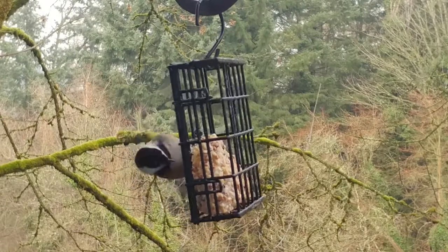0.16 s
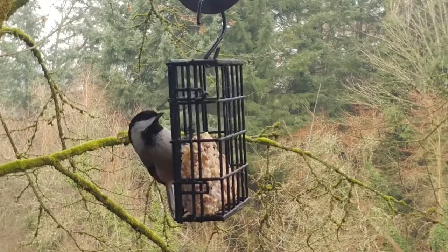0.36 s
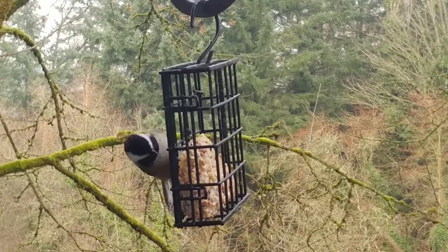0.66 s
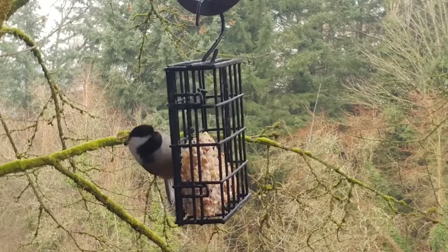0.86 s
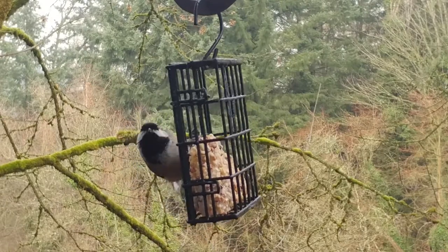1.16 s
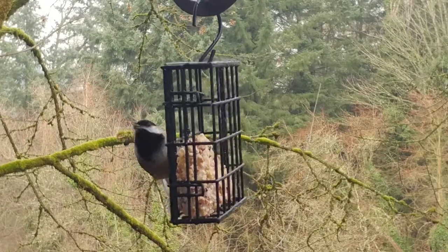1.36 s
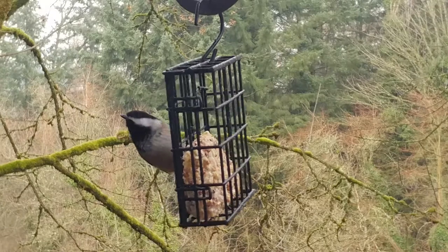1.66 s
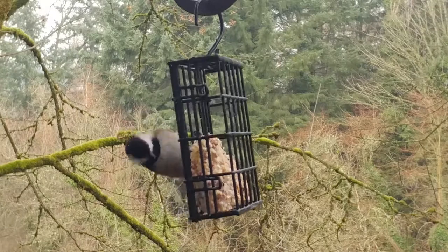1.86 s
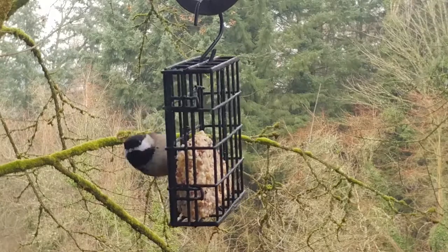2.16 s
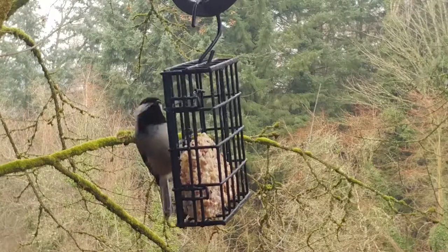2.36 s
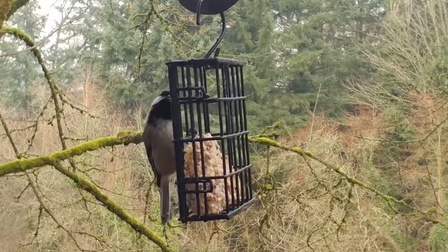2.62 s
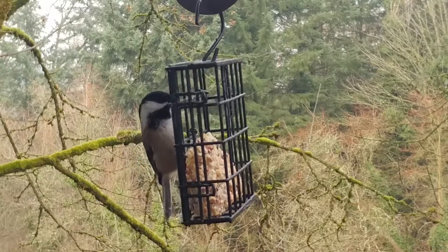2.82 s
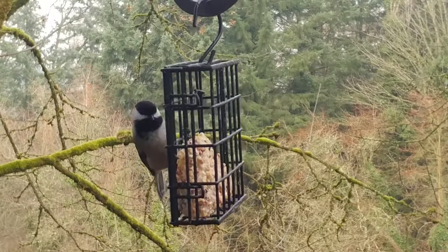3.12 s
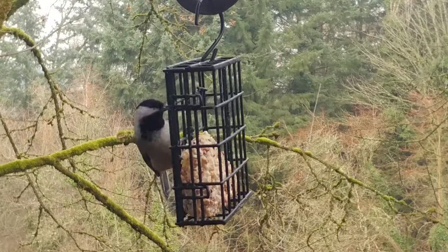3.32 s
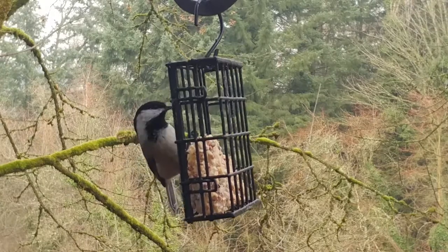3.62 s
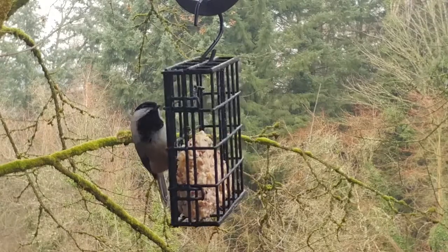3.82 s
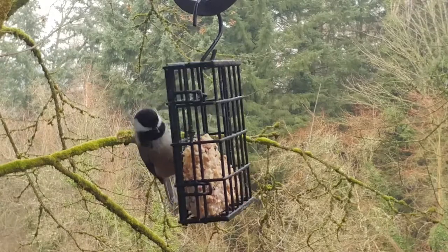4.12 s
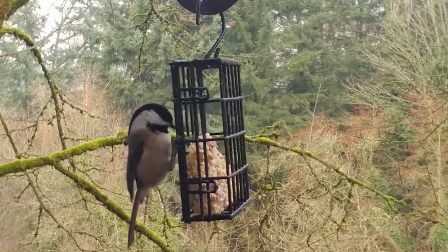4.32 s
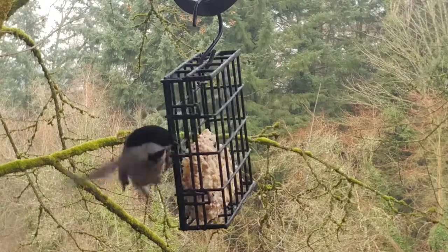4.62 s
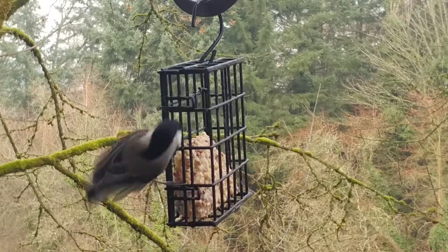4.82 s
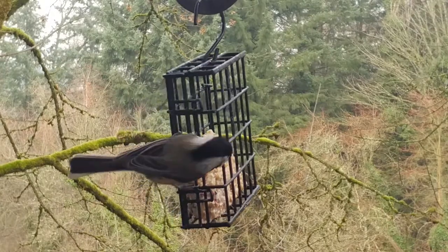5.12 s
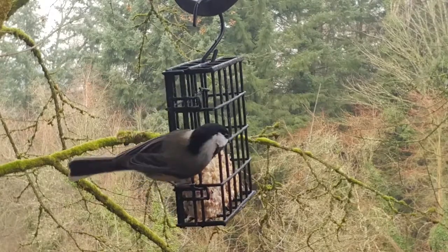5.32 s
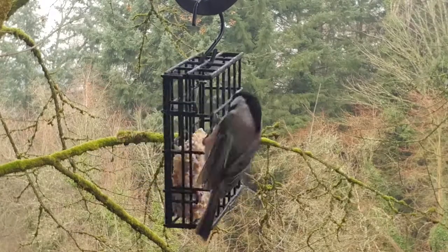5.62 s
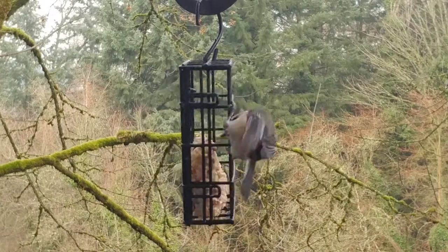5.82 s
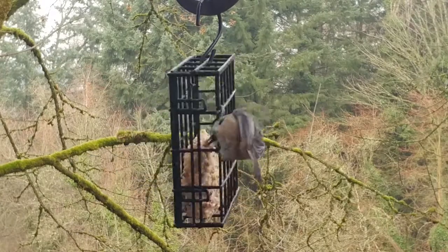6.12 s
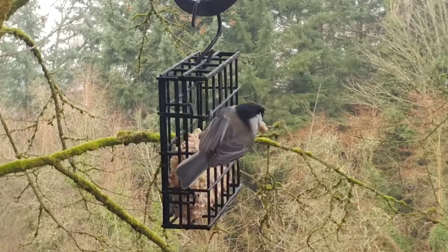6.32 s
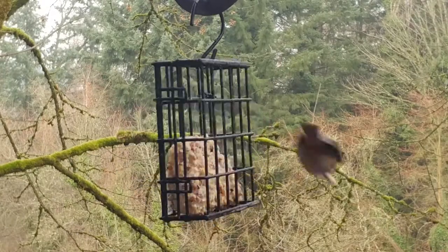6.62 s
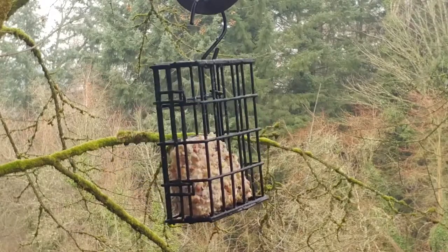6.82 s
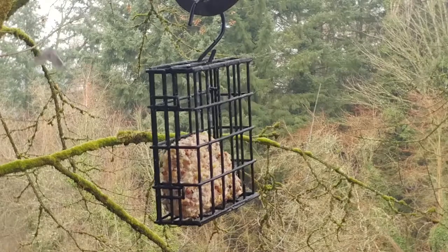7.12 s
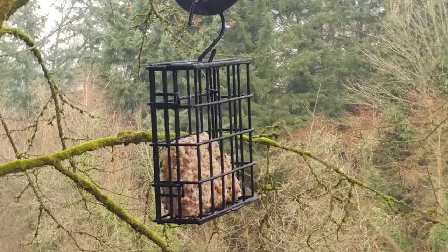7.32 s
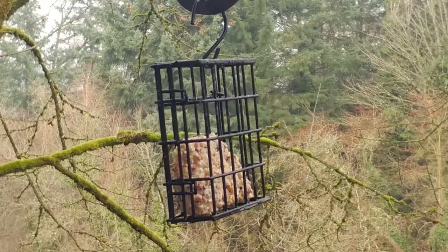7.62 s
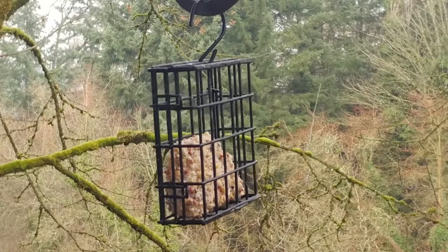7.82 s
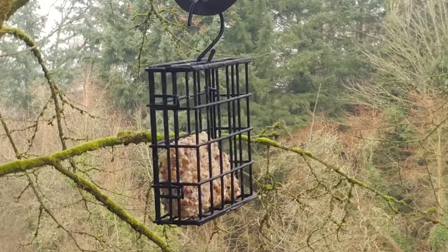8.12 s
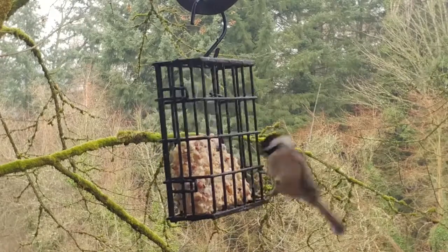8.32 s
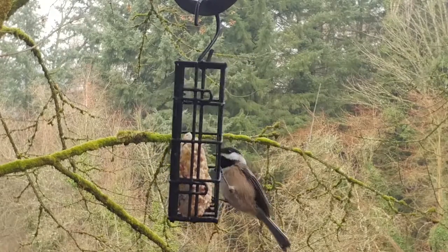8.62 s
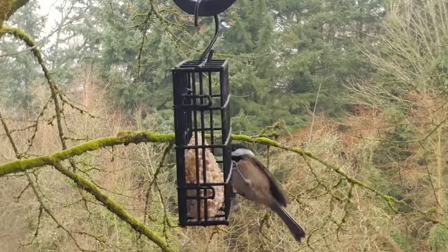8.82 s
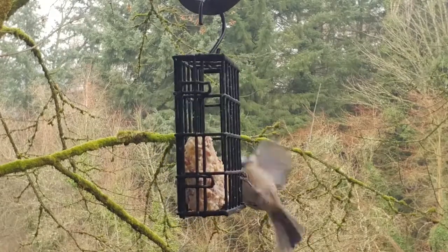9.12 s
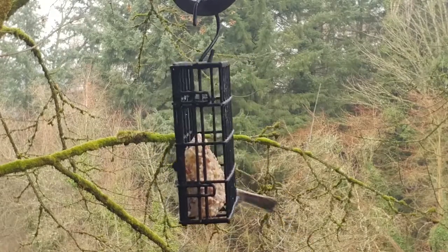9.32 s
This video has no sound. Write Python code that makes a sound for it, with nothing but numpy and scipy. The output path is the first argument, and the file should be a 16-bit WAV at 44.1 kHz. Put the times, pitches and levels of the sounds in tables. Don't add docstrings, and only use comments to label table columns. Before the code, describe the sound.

Chickadees give thin high calls and one quick gargle at a woodland feeder while distant road roar gives way to a car approaching from the right.

```python
import sys
import numpy as np
from scipy import signal
from scipy.fft import rfft, irfft, next_fast_len
from scipy.io import wavfile
from scipy.ndimage import uniform_filter1d, map_coordinates

SR = 44100
rng = np.random.default_rng(int(sys.argv[2]) if len(sys.argv) > 2 else 0)


def boost_factor(decibels):
    exponent = np.asarray(decibels, float) / 20
    return 10 ** exponent


def master(y):
    cut = np.clip(np.atleast_2d(y).T, -1, 1)
    pcm = np.round(cut * 32767)
    wavfile.write(sys.argv[1], SR, pcm.astype(np.int16))


N = 417186


def unit(x):
    return x / np.sqrt(np.mean(x ** 2) + 1e-20)


def along(points, hz):
    f, v = np.transpose(points)
    return np.interp(np.log(hz + 1), np.log(f + 1), v)


def curves(rows, t):
    s, *cols = np.transpose(rows)
    return [np.interp(t, s, c) for c in cols]


def wobble(rate):
    knots = rng.standard_normal(int(N * rate / SR) + 4)
    return map_coordinates(knots, [np.arange(N) * rate / SR])


def filtered(x, response):
    m = next_fast_len(x.shape[-1] + SR // 4)
    y = irfft(rfft(x, m) * response(np.fft.rfftfreq(m, 1 / SR)), m)
    return y[..., :x.shape[-1]]


def resonance(f, hz, width_hz):
    return 1j * f * width_hz / (hz ** 2 - f * f + 1j * f * width_hz)


def rush(spectrum, alike, patchy_db, lag=lambda hz: 0 * hz):
    z = signal.stft(rng.standard_normal((2, N)), nperseg=512)[2]
    field = uniform_filter1d(rng.standard_normal(z.shape[1:]), size=4, axis=0)
    field = uniform_filter1d(field, size=8, axis=1)
    pair = signal.istft(z * boost_factor(patchy_db * unit(field)), nperseg=512)[1][:, :N]
    m = next_fast_len(N)
    hz = np.fft.rfftfreq(m, 1 / SR)
    turn = np.arccos(np.clip(along(alike, hz), -1, 1)) / 2
    mid, side = rfft(pair, m) * boost_factor(along(spectrum, hz)) * [np.cos(turn), np.sin(turn)]
    shift = np.exp(-.5j * np.outer([1, -1], lag(hz)))
    return unit(irfft([mid + side, mid - side] * shift, m)[:, :N])


def from_right(hz):
    return 2 * np.pi * hz * 0.00043


def car_levels():
    t = np.arange(N) / SR
    # time_s, distance_m
    distances = [(0, 49), (2.5, 74), (5.4, 40), (6.2, 23), (7.2, 15.1), (9.46, 8.94)]
    # time_s, level_db
    bank_rows = [(0, -37.5), (7.4, -31), (7.95, -21), (8.2, -9.5), (8.8, -5.5), (9.25, -2.5), (9.46, -1.5)]
    near_db = -20 * np.log10(curves(distances, t)[0] / 10)
    body_db = near_db + curves(bank_rows, t)[0]
    return near_db, body_db, boost_factor(0.39 * body_db)


def rumble(spill):
    # freq_hz, density_db (per Hz)
    bass = [(15, -53), (25, -20), (56, 3), (70, -0.5), (87, 5), (104, -4), (146, -4.5), (177, -11.5),
            (227, -12.5), (260, -12.5), (340, -31), (570, -120)]
    return (boost_factor(-46) + boost_factor(-44) * spill) * rush(bass, [(30, 0.96), (250, 0.99)], patchy_db=0.5)


def far_road(spill):
    # time_s, level_db
    swell = [(0, -44), (2.5, -39), (4.2, -37), (5.4, -36), (6.3, -39), (7.2, -46.5), (9.46, -65)]
    # freq_hz, density_db (per Hz)
    roar = [(120, -55.5), (200, -8), (340, -2.5), (520, -0.5), (700, 5), (880, 0.5), (1050, -9.5),
            (1400, -17), (2100, -22.5), (3000, -37.5), (5000, -60), (9000, -120)]
    # freq_hz, coherence (0-1)
    roar_alike = [(200, 1), (350, 1), (520, 1), (700, 0.79), (950, 0.09), (1350, 0.5), (3500, 0.91),
                  (5000, 0.4)]
    road_db, = curves(swell, np.arange(N) / SR)

    def lag(hz):
        return from_right(hz) / (1 + np.exp(np.clip((480 - hz) / 90, -50, 50)))

    level = (boost_factor(road_db) + boost_factor(-36.5) * spill) * boost_factor(0.76 * wobble(8))
    return level * rush(roar, roar_alike, patchy_db=1.44, lag=lag)


def car_tyres(near_db):
    # freq_hz, density_db (per Hz)
    tyre_roar = [(100, -31.5), (200, -6.5), (350, -3.5), (520, 0.5), (700, -8), (880, -4.5), (1200, -12),
                 (1750, -21.5), (2400, -21), (3000, -33), (5000, -41.5), (7500, -38.5), (10000, -65.5),
                 (13000, -120)]
    # freq_hz, coherence (0-1)
    tyre_alike = [(200, 0.97), (400, 1), (850, 0.81), (1300, 0.48), (2300, 0.2), (5000, 0.13)]
    noise = rush(tyre_roar, tyre_alike, patchy_db=1.64,
                 lag=lambda hz: from_right(hz) / (1 + (400 / (hz + 1)) ** 4))
    return boost_factor(-33.5 + near_db + 0.56 * wobble(7)) * noise


def car_body(body_db):
    # freq_hz, density_db (per Hz)
    body_bands = [(200, -38.5), (300, -13), (430, 0), (560, 10), (680, -0.5), (850, -23), (1200, -41),
                  (1750, -37), (2100, -29), (2280, -20), (2550, -34.5), (3200, -47), (3850, -31),
                  (4400, -44.5), (5300, -48.5), (6500, -36.5), (9000, -51.5), (13000, -120)]
    # freq_hz, coherence (0-1)
    body_alike = [(200, .92), (450, 0.8), (850, 0.9), (1400, .5), (2300, 0.5), (7000, 0.1)]
    # time_s, level_db
    clearing = [(0, -30), (8.95, -22.5), (9.15, -9), (9.3, 1), (9.46, 1.5)]
    noise = rush(body_bands, body_alike, patchy_db=0.0,
                 lag=lambda hz: from_right(hz) + .5 * (hz > 450) * (hz < 1000))
    drone = boost_factor(-26 + body_db) * noise
    bright = filtered(drone, lambda hz: hz > 1800)
    return drone + boost_factor(curves(clearing, np.arange(N) / SR)[0]) * bright


def tree_hiss(spill):
    # freq_hz, density_db (per Hz)
    leaf_noise = [(1500, -16.5), (3000, 9.5), (4500, 5), (7000, -1.5), (12300, 1.5), (13300, 0),
                  (14300, -23.5), (15000, -120)]
    return (boost_factor(-69.5) + boost_factor(-65.5) * spill) * rush(leaf_noise, [(3000, 0.18), (6000, 0.038)], patchy_db=2.0)


def traffic():
    near_db, body_db, spill = car_levels()
    rolling = car_body(body_db) + far_road(spill) + car_tyres(near_db)

    def ground(hz):
        delay = np.exp(-2j * np.pi * hz * 3.008 / 1000)
        return 1 + 0.17 * delay / (1 + (1100 / (hz + 1)) ** 4)

    return rumble(spill) + filtered(rolling, ground) + tree_hiss(spill)


def sing(rows, second_db, third_db, tilt_db=0, fourth_db=-80, purer=0):
    start, stop = round(rows[0][0] * SR), round(rows[-1][0] * SR)
    times = np.arange(start, stop) / SR
    *pitches, db = [uniform_filter1d(c, size=30) for c in curves(rows, times)]
    flow = sum(np.sin(2 * np.pi * np.cumsum(hz) / SR) for hz in pitches)
    slack_db = tilt_db * np.minimum(np.log2(7500 / pitches[0]), .55)
    slack_db = slack_db + purer * (db.max() - db)
    bent = flow + 2 * boost_factor(second_db + slack_db) * flow ** 2
    bent = bent + 4 * boost_factor(third_db) * (flow ** 3 - 1.2 * flow)
    bent = bent + 8 * boost_factor(fourth_db) * (flow ** 4 - flow ** 2)
    return start, np.sqrt(2) * boost_factor(db) * bent * signal.windows.tukey(len(db), .08)


def add(bus, note, pan_db, echo_db, lag_us=47):
    start, sound = note
    late = lambda hz: np.exp(-2j * np.pi * np.outer([.5, -.5, 0], hz) * lag_us / 1045000.0)
    gains = boost_factor([[pan_db / 2], [-pan_db / 2], [echo_db]])
    bus[:, start:start + len(sound)] += gains * filtered(sound, late)


def call(bus, shape, event, voice, law, third_db, lag_us=47, fade_db=0):
    s, effort, db, pan_db, echo_db = event
    lean_db, drop_db, second_db, tilt_db = voice
    longer, higher = law
    stretch, pitch = effort ** longer, np.clip(effort ** higher, .94, 1.03)
    rows = []
    for k, (ms, hz, level) in enumerate(shape):
        steps_down = k + 4 - len(shape)
        level = level + lean_db * (ms / shape[-1][0] - .5)
        level = level + drop_db * (steps_down >= 0) + fade_db * max(steps_down, 0)
        rows.append((s + ms * stretch / 1000, hz * pitch, db + level))
    add(bus, sing(rows, second_db, third_db, tilt_db), pan_db, echo_db, lag_us)


def seets(near):
    # time_ms, pitch_hz, level_db
    seet_shape = [(0, 7200, -33), (2, 7330, -8.5), (6.14, 7520, -5.5), (11.84, 7680, -2), (18.8, 7760, -5),
                  (20.96, 7910, 0), (23.3, 5670, -3.5), (23.13, 4500, -12), (24.2, 2800, -29)]
    # start_s, effort (1 = usual), level_db, left_right_db, echo_db
    seet_calls = [
        (.105, 0.99, -20.5, -1.5, -14),
        (0.825, 0.99, -25.5, -1.5, -16),
        (1.759, 1.002, -26.5, 0.5, -12.5),
        (3.548, 1.003, -25.5, -3, -14.5),
        (5.3155, 1, -25, 1, -8),
    ]
    # lean_db over the note, drop_db extra, overtone_db, tilt_db per octave of slackening
    seet_voices = [(2.5, -1, -15.5, -10), (-0.5, -3, -13, -23.5), (-9, 6, -12, -10.5), (-6, 2, -12, 0),
                   (-5.5, 6, -16, 3)]
    seet_lags = [27, 38, 46, 27, 50]
    seet_fades = [-8.5, -2.5, -4.5, -1, -0.5]
    for event, voice, lag_us, fade_db in zip(seet_calls, seet_voices, seet_lags, seet_fades):
        call(near, seet_shape, event, voice, (2.1, 0.99), -34, lag_us, fade_db)


def stroke(s, ms, from_hz, to_hz, db):
    peak = 0.53 if to_hz < from_hz else 0.577
    return [(s + u * ms / 1000, from_hz * (to_hz / from_hz) ** u, db + edge_db)
            for u, edge_db in [(0, -19), (peak, 0), (1, -12)]]


def hook(s, swell_ms, from_hz, held_hz, db, drop_db):
    top = s + (swell_ms + 1.9) / 1000
    halfway_db = -3 if held_hz > from_hz else -12.5
    rows = [(s, from_hz, db - 28),
            (s + swell_ms / 2000, .3 * from_hz + .7 * held_hz, db + halfway_db),
            (s + swell_ms / 1000, held_hz, db)]
    for ms in np.linspace(0, 5.4, num=12):
        hz = 4700 + (held_hz * 1.11 - 4700) / (1 + (ms / 1.92) ** 2.03)
        rows.append((top + ms / 1000, hz, db - 0.5 + drop_db - 9.5 * max(ms - 1.8, 0)))
    return rows


def gargle(near, low, buzz):
    # start_s, length_ms, from_hz, to_hz, peak_db
    stroke_rows = [(1.197, 11.8, 6650, 7030, -19.5), (1.2917, 3.3, 5300, 7300, -28),
                   (1.2985, 4, 5600, 6800, -36), (1.325, 14, 4700, 3295, -50),
                   (1.35, 7.97, 3600, 2500, -50), (1.361, 4.7, 4680, 3090, -32),
                   (1.3658, 4, 4260, 3110, -39), (1.368, 18, 4000, 2790, -44),
                   (1.382, 7.4, 5320, 5800, -33), (1.404, 13, 3300, 1950, -45), (1.41, 6, 4720, 3360, -46),
                   (1.4185, 5.9, 2800, 1860, -42), (1.4226, 4, 4470, 3240, -41),
                   (1.43, 4.7, 4480, 3020, -40), (1.437, 5, 4120, 3000, -42),
                   (1.4445, 3.6, 4300, 3510, -41), (1.5435, 4.5, 5900, 4200, -43),
                   (1.5442, 4.06, 4620, 3400, -38), (1.5435, 3.3, 4300, 2900, -43),
                   (1.551, 3.7, 4330, 3100, -45), (1.5565, 4.4, 3300, 2200, -48),
                   (1.568, 7, 3400, 2090, -53), (1.563, 5, 2580, 1900, -48), (1.549, 5, 4560, 3700, -41),
                   (1.554, 8.1, 4400, 2330, -49), (1.559, 11, 4000, 2100, -55)]
    # start_s, swell_ms, from_hz, held_hz, peak_db
    hook_rows = [
        (1.208, 20, 7140, 7370, -23.5),
        (1.303, 14.4, 8100, 7410, -19),
        (1.391, 1.5, 6120, 6280, -18),
    ]
    # drop_db extra, overtone_db, tilt_db per octave, echo_db
    hook_voices = [(-2.5, -40, 75, -4.5), (1, -35.5, 90, -4), (0, -37.5, 65, -9)]
    hook_pans = [-7.5, -3.5, -7]
    hook_lags = [18, 19, 77]
    # time_s, pitch_hz, level_db
    arch_rows = [(1.2908, 7100, -40.5), (1.2925, 8300, -32.5), (1.2945, 9000, -30.5), (1.297, 9100, -28.5),
                 (1.3005, 8900, -38), (1.3045, 8140, -35)]
    # time_s, pitch_hz, level_db
    croak_rows = [(1.197, 3470, -44), (1.199, 3500, -34.5), (1.2015, 3440, -46), (1.2045, 3500, -41.5),
                  (1.207, 3480, -49), (1.222, 3500, -60)]
    # time_s, low_hz, high_hz, level_db
    buzz_rows = [(1.441, 3390, 3784, -58), (1.45, 3280, 3690, -55), (1.462, 3265, 3560, -47),
                 (1.472, 3256, 3600, -46), (1.485, 3296, 3620, -40), (1.5, 3274, 3660, -40.5),
                 (1.515, 3290, 3610, -43), (1.526, 3250, 3540, -52), (1.537, 3320, 3560, -55)]
    # time_s, pitch_hz, level_db
    whistle_rows = [(1.572, 3380, -52), (1.586, 3245, -47), (1.6, 3240, -48), (1.61, 3290, -44),
                    (1.618, 3230, -34), (1.63, 3266, -33), (1.662, 3287, -32.5), (1.682, 3340, -38),
                    (1.692, 3360, -56)]
    for row in stroke_rows:
        if row[2] > 5100:
            add(near, sing(stroke(*row), second_db=-30, third_db=-45), pan_db=-10, echo_db=-7)
        else:
            add(low, sing(stroke(*row), second_db=-15, third_db=-33), pan_db=-5, echo_db=-1.5)
    for row, voice, pan_db, lag_us in zip(hook_rows, hook_voices, hook_pans, hook_lags):
        drop_db, second_db, tilt_db, echo_db = voice
        note = sing(hook(*row, drop_db), second_db, third_db=-47.0, tilt_db=tilt_db)
        add(near, note, pan_db, echo_db, lag_us)
    add(near, sing(arch_rows, second_db=-40, third_db=-48), pan_db=-3.5, echo_db=-6.5)
    add(low, sing(croak_rows, second_db=-33.0, third_db=-8), pan_db=-1.5, echo_db=-8, lag_us=30)
    add(buzz, sing(buzz_rows, second_db=-28.0, third_db=-30, fourth_db=-45.5),
        pan_db=-14.5, echo_db=-2.5, lag_us=72)
    add(near, sing(whistle_rows, second_db=-19, third_db=-21.5, fourth_db=-45, purer=.7),
        pan_db=-4.0, echo_db=-7, lag_us=59)


def chips(near):
    # time_ms, pitch_hz, level_db
    chip_shape = [(0, 6700, -25), (2, 8900, -12), (4, 8500, -0.5), (5.5, 7600, -1), (7, 6900, 2.5),
                  (8.4, 4600, -1), (9.4, 4000, -13), (10.6, 2700, -20), (12, 1900, -24)]
    # start_s, effort (1 = usual), level_db, left_right_db, echo_db
    chip_calls = [
        (2.1942, .97, -40.5, -4, -5.5),
        (3.0397, .99, -45.5, 5, 0.5),
        (3.6734, 1.03, -37.5, -3.5, -5),
        (4.1199, .96, -48, -17, -0.5),
        (5.5502, .985, -51, 6.5, 7.5),
    ]
    # lean_db over the note, drop_db extra, overtone_db, tilt_db per octave of slackening
    chip_voices = [(0, 0, -16.5, 9), (0, 0, -11, 5), (0, 0, -15, 9), (0, 2, -10.5, 5), (0, 0, -8.5, 3)]
    for event, voice in zip(chip_calls, chip_voices):
        call(near, chip_shape, event, voice, (3, 0.84), -24)


def longs(far):
    # time_ms, pitch_hz, level_db
    long_shape = [(0, 3900, -18), (3, 6900, -4.5), (6.97, 7230, -6), (15.1, 7500, -3), (26.9, 7780, -6.5),
                  (35.9, 7850, -5), (38.5, 7200, -3), (42.5, 5100, -24)]
    # start_s, effort (1 = usual), level_db, left_right_db, echo_db
    long_calls = [(2.326, 0.5, -77.5, -1, 8), (2.4, .5, -79, -3, 9), (2.814, 1.1, -52, -10, 10.5),
                  (4.7755, 0.23, -56, -9, 9), (4.843, .3, -58, -10, 2), (5.712, 1.3, -44, -16, 3)]
    # lean_db over the note, drop_db extra, overtone_db, tilt_db per octave of slackening
    long_voices = [(0, 0, -52, 9), (0, 0, -52, 9), (0, 2.5, -36, -9), (0, -6, -45, 9), (0, -2, -45, 9),
                   (0, -2, -58, 9)]
    for event, voice in zip(long_calls, long_voices):
        call(far, long_shape, event, voice, (0.89, 0.0044), -45)


def outdoors(bus, t60):
    # delay_ms, left_db, right_db
    wall_echoes = [(3.6, -14, -15.5), (10.4, -21, -11.5), (16, -28.5, -17)]
    t = np.arange(SR // 3) / SR
    trunks, twigs = rng.standard_normal((2, 2, len(t)))
    dull = signal.butter(2, 10430, fs=SR)
    tail = signal.lfilter(*dull, trunks) * boost_factor(-60 * t / t60) + 3.3 * twigs * boost_factor(-60 * t / 0.051)

    def copies(hz):
        echoes = sum(boost_factor([[left], [right]]) * np.exp(-2j * np.pi * hz * ms / 1000)
                     for ms, left, right in wall_echoes)
        return 1 + (resonance(hz, 7350, 1300) ** 2 + 0.26) * echoes

    gap = lambda hz: 1 - 0.2 * np.exp(-((hz - 5550) / 1100) ** 2)
    trees = signal.oaconvolve(filtered(bus[2:], gap), tail / np.linalg.norm(tail[0]), axes=1)
    return filtered(bus[:2], copies) + trees[:, :bus.shape[1]]


def chickadees():
    n = round(6.4 * SR)
    near, far, low, buzz = np.zeros((4, 3, n))
    seets(near)
    gargle(near, low, buzz)
    chips(near)
    longs(far)
    far[:2] *= boost_factor(6.5 * np.array([wobble(260), wobble(260)])[:, :n])
    rasp = wobble(220)[:n]
    close = near + low * boost_factor(6.5 / 2 * rasp) + buzz * boost_factor(.8 * rasp)
    heard = outdoors(close, t60=0.2) + outdoors(far, t60=0.31)
    return filtered(np.pad(heard, [(0, 0), (0, N - n)]), lambda hz: 1 / (1 + (1700 / (hz + 1)) ** 8))


def knocks():
    # start_s, level_db
    blow_rows = [
        (.3275, 3.5),
        (.346, -7.5),
        (1.9785, -1),
    ]
    blows = np.zeros(N)
    for s, db in blow_rows:
        blows[round(s * SR)] = -boost_factor(db + 15.0)

    def hollow(f):
        modes = resonance(f, 652, 440) ** 3 + 0.26 * resonance(f, 472, 318) ** 2
        modes = modes + 0.072 * resonance(f, 1600, 700)
        return modes / (1 + 1j * f / 700)

    return boost_factor([[0], [-4]]) * filtered(blows, hollow)


def wings():
    # start_s, peak_db
    flicks = [(4.7765, -52), (4.8408, -45), (5.622, -55), (5.64, -59), (5.654, -57), (6.7194, -52),
              (6.756, -50), (6.7925, -57), (6.8349, -47), (6.8494, -54), (6.8765, -51), (6.8994, -51),
              (6.9134, -53), (8.1889, -62)]
    t, level = np.arange(SR // 10) / SR, np.zeros(N + SR)
    for s, db in flicks:
        puff = boost_factor(db - 8.5 - 60 * t / 0.089) * (1 - np.exp(-t / 0.001))
        level[round(s * SR):][:len(t)] += puff
    spectrum = [(1200, -32), (3000, -10), (6000, -16), (10000, -12), (12800, -6), (14500, -31), (16000, -120)]
    return level[:N] * rush(spectrum, [(3000, 0.29)], patchy_db=-5.0)


def claws():
    # start_s, level_db
    tick_rows = [
        (5.7205, -49),
        (6.134, -51),
    ]
    t, tick = np.arange(SR // 50) / SR, np.zeros(N)
    for s, db in tick_rows:
        envelope = boost_factor(db + 12 - 60 * t / 0.006) * (1 - np.exp(-t / .0004))
        tick[round(s * SR):][:len(t)] = envelope * rng.standard_normal(len(t))
    return filtered(tick, lambda f: resonance(f, 5400, 3200) ** 2)


def scene():
    return traffic() + chickadees() + knocks() + wings() + claws()


def low_pass(x):
    return signal.sosfilt(signal.butter(12, 16980, fs=SR, output="sos"), x)


def record(dry):
    # freq_hz, gain_db
    left_colour = [(170, 1.5), (330, 3), (520, 4), (700, 12), (870, 7.5), (1050, 4), (1750, 6), (2100, 4),
                   (3400, -1), (8100, -0.5), (8900, -2), (10300, 14), (11800, 0.5), (13200, -5.5),
                   (15300, 1.5)]
    # freq_hz, gain_db
    right_colour = [(3000, 0), (6000, -1), (7400, 3), (8500, 1), (9250, -28.5), (10000, -21), (12900, -5.5),
                    (15300, -17)]

    def response(hz):
        colour = boost_factor([along(left_colour, hz), along(right_colour, hz)])
        return colour * (hz < 15900) / (1 + (36 / (hz + 1)) ** 4)

    return low_pass(filtered(dry, response))


dry = scene()
out = record(dry)
master(out)
```